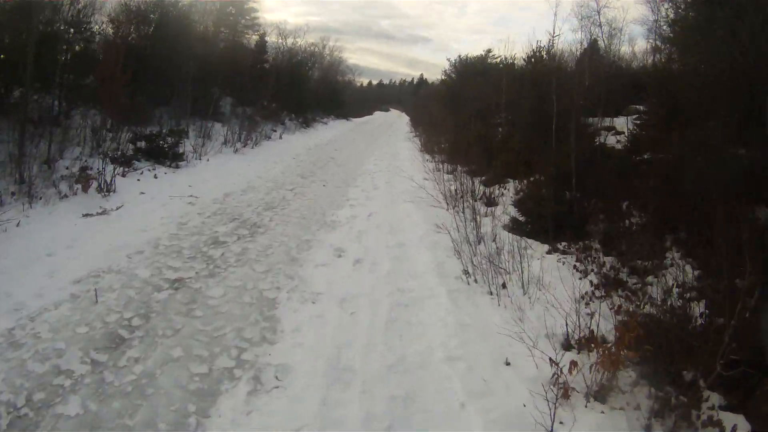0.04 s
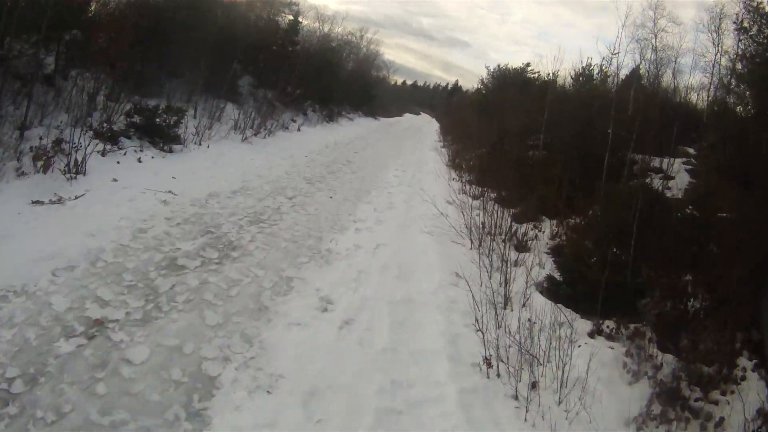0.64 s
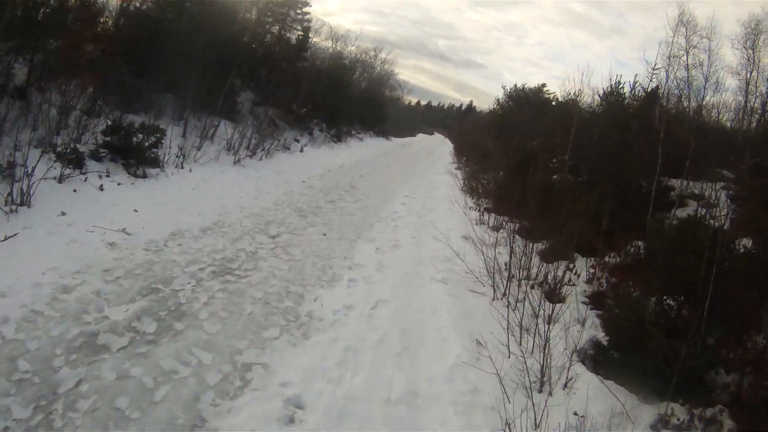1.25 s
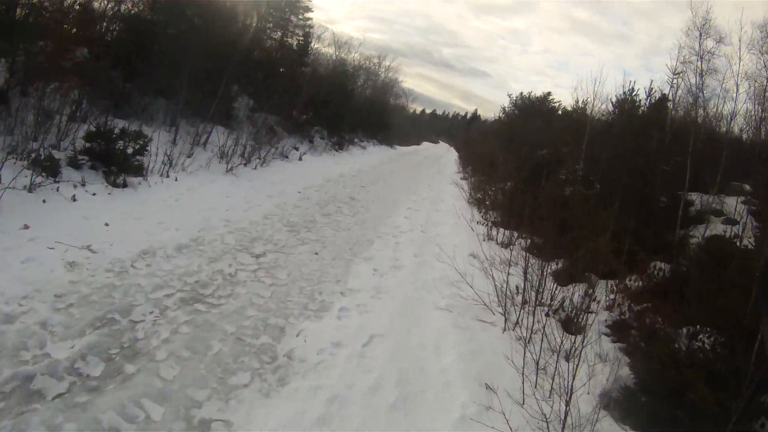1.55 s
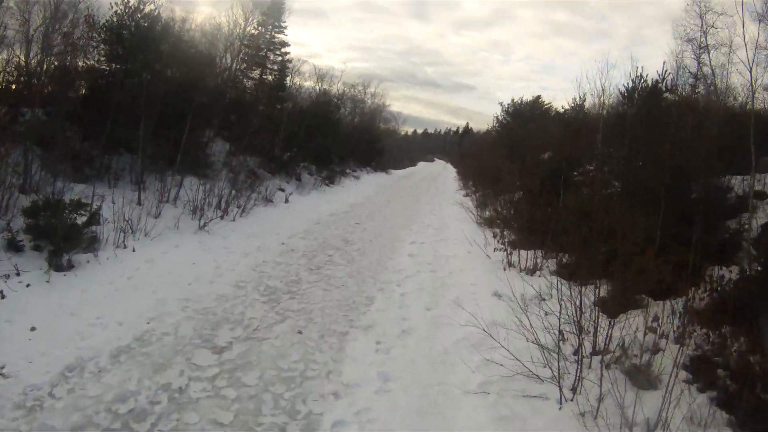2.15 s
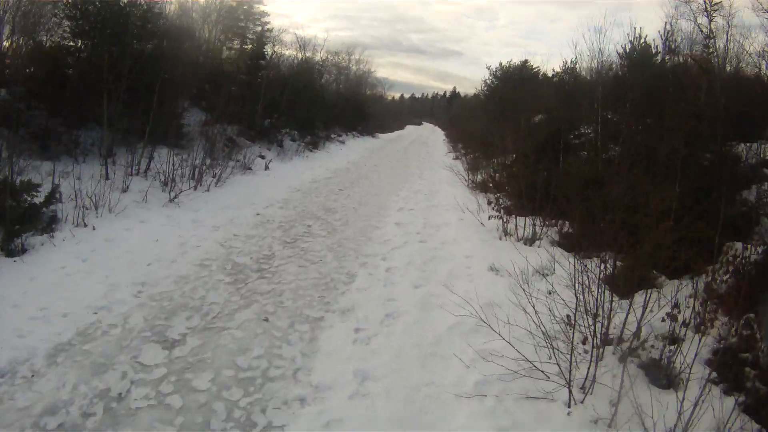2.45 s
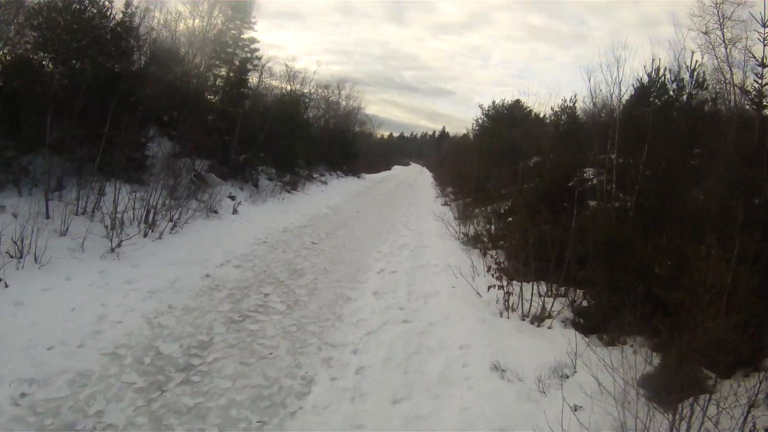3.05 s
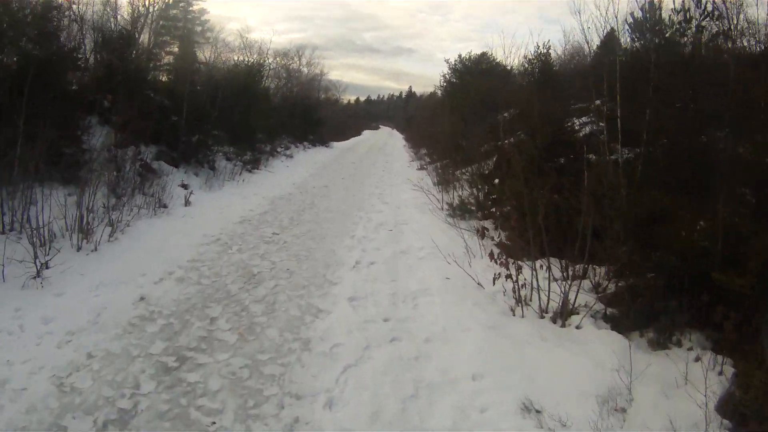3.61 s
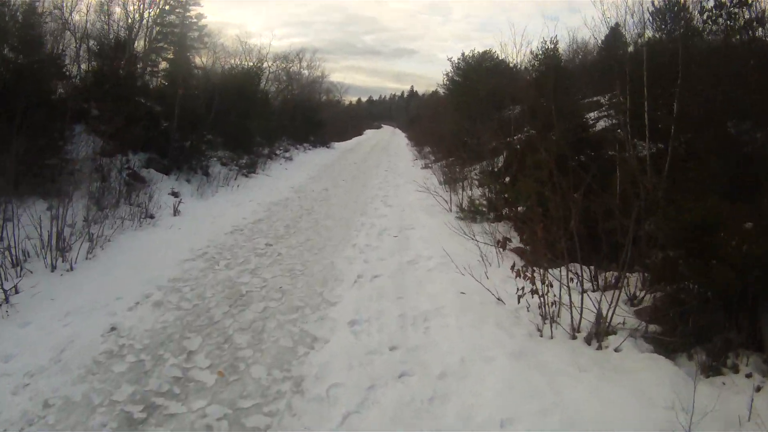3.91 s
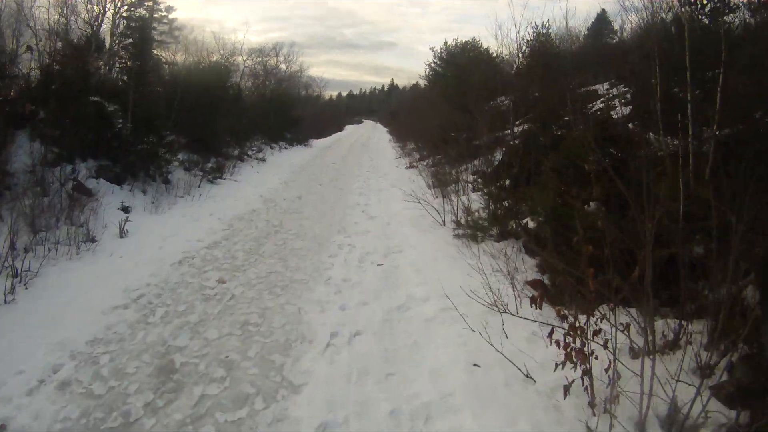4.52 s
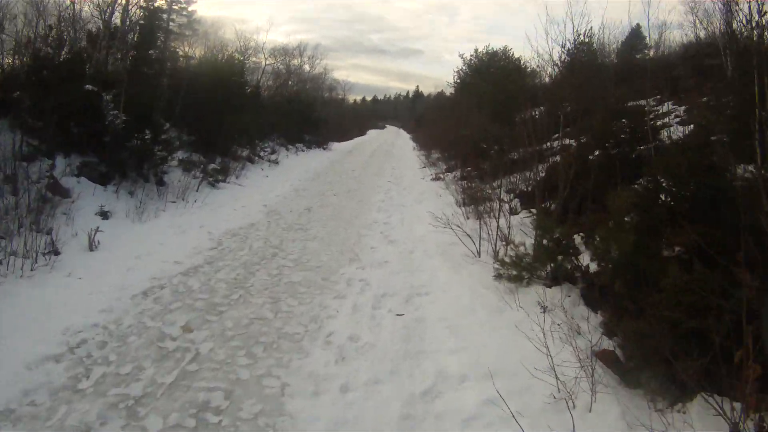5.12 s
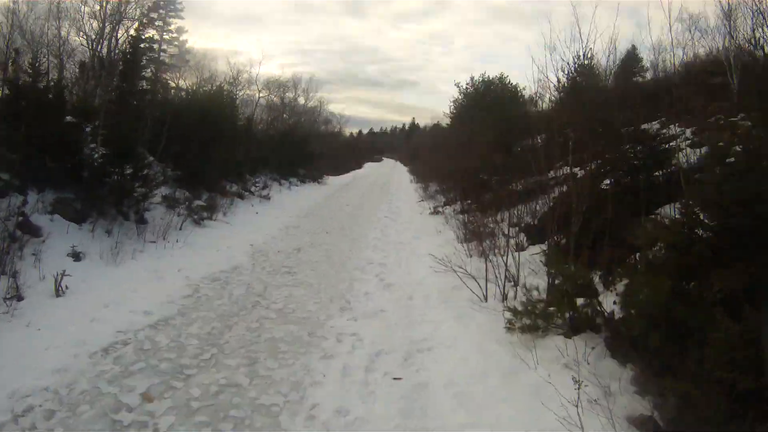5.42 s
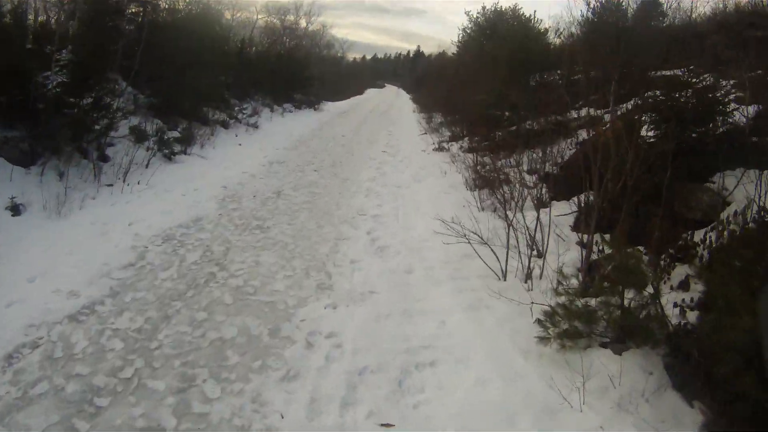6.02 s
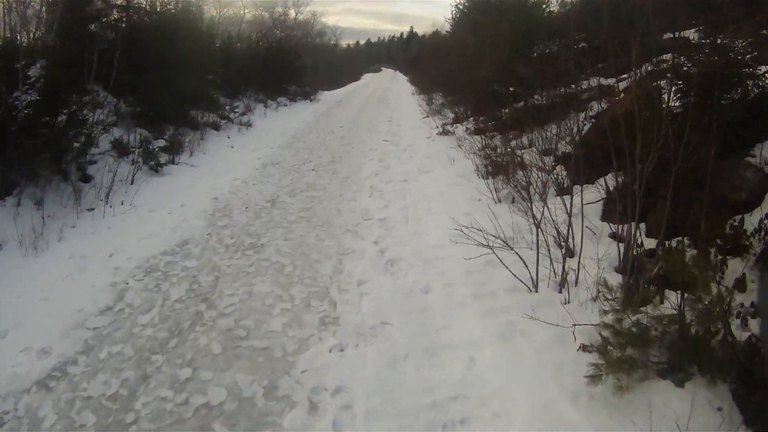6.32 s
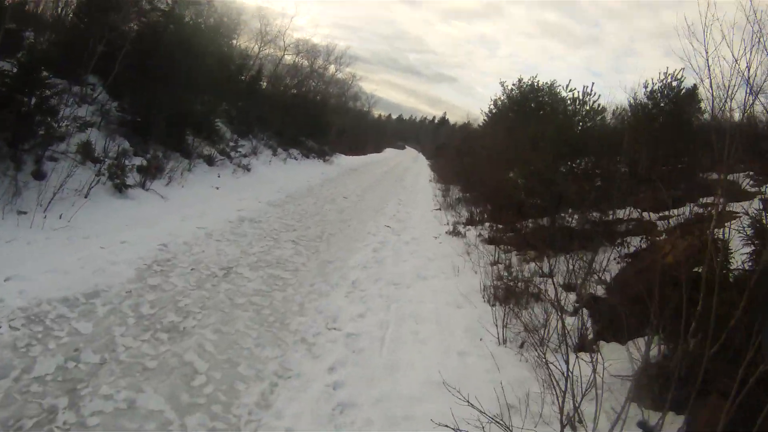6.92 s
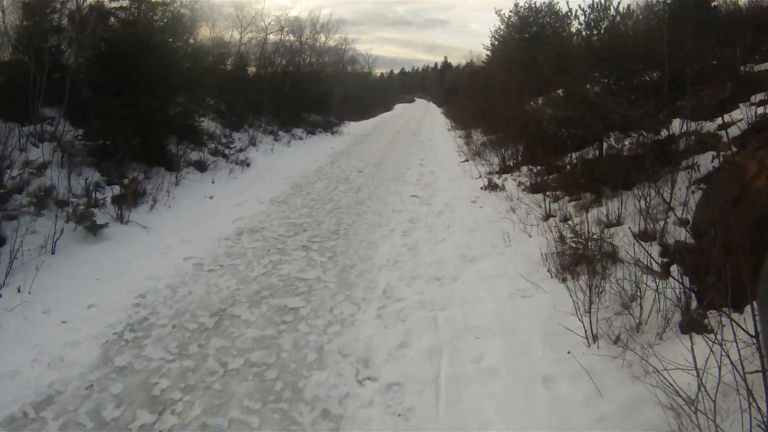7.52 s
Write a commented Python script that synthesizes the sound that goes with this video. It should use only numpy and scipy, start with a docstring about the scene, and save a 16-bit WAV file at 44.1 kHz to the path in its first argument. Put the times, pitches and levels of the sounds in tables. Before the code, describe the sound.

Close, rough crunching of ice under rolling studded bike tyres, with sharp snaps, dull bumps and a little wind.

```python
"""Studded bicycle tyres on a frozen trail.

Heard close up, from a camera microphone in a closed housing that a little wind brushes.
The tyres rumble over frozen ruts and the studs crush the icy crust in crackly bursts. Plates of
ice crack and ring, chips snap off, glaze crackles, shards skitter and packed snow squeaks."""
import sys
import numpy as np
from scipy import signal
from scipy.fft import rfft, irfft, next_fast_len
from scipy.io import wavfile
from scipy.ndimage import map_coordinates

SR = 44100
rng = np.random.default_rng(int(sys.argv[2]) if len(sys.argv) > 2 else 0)


def digitize_waveform(pressure):
    """Quantize a signal to 16-bit integers and store it at the path in sys.argv[1].

    Rows of a 2-D input are taken as channels; values are limited to [-1, 1].
    """
    field = np.atleast_2d(pressure).T
    bounded = np.clip(field, -1, 1)
    quanta = np.round(bounded * 32767).astype(np.int16)
    wavfile.write(sys.argv[1], SR, quanta)


N = 341775


def amp(db):
    """Decibels to gain."""
    return 10 ** (np.asarray(db) / 20)


def unit(x):
    """Scale to rms 1."""
    return x / np.sqrt(np.mean(x ** 2) + 1e-20)


def curves(rows):
    """One value per sample for each column after the time."""
    times, *columns = np.transpose(rows)
    return [np.interp(np.arange(N) / SR, times, column) for column in columns]


def wobble(rate):
    """A smooth random curve, rate knots a second."""
    knots = rng.standard_normal(int(N * rate / SR) + 4)
    return map_coordinates(knots, [np.arange(N) * rate / SR])


def coloured(x, spectrum):
    """Causal filter through (freq_hz, gain_db) points, so that attacks stay sharp."""
    size = 2 * next_fast_len(N // 2 + SR // 10, real=True)
    hz, db = np.transpose(spectrum)
    gain = amp(np.interp(np.log(np.fft.rfftfreq(size, 1 / SR) + 1), np.log(hz), db))
    cepstrum = irfft(np.log(gain))
    cepstrum[1:size // 2] *= 2  # fold to minimum phase
    cepstrum[size // 2 + 1:] = 0
    return irfft(rfft(x, size) * np.exp(rfft(cepstrum)), size)[:N]


def add(track, start_s, sound):
    """Mix a short sound into the track from start_s on."""
    start = int(np.clip(round(start_s * SR), 0, N - 1))
    track[start:start + len(sound)] += sound[:N - start]


def swell(length_s, attack_s, release_s):
    """An envelope that rises, holds until length_s and dies away."""
    t = np.arange(int((length_s + 6 * release_s) * SR)) / SR
    return np.minimum(t / attack_s, 1) * np.exp(-np.maximum(t - length_s, 0) / release_s)


def with_swells(steady_db, events, attack_s, release_s):
    """Two steady levels in dB plus a swell for each event (start_s, length_s, level_db, level_db)."""
    power = amp(steady_db) ** 2
    for start_s, length_s, *levels_db in events:
        for track, db in zip(power, levels_db):
            add(track, start_s, (amp(db) * swell(length_s, attack_s, release_s)) ** 2)
    return 10 * np.log10(power)


def fractures(rate, spread_db, life_s, debris_ratio=0.15):
    """Power (mean 1) of tiny random fractures, each dying fast and leaving longer-lived debris."""
    size = amp(spread_db * np.minimum(rng.standard_normal(N), 1.6))
    hits = (rng.random(N) < rate / SR) * size ** 2
    snap = signal.lfilter([1], [1, -np.exp(-1 / (life_s * SR))], hits)
    debris = signal.lfilter([1], [1, -np.exp(-1 / (4.5 * life_s * SR))], hits)
    return (snap / snap.mean() + debris_ratio * debris / debris.mean()) / (1 + debris_ratio)


def grains(power, spectrum):
    """Bursts of coloured noise that follow a power curve; rms 1."""
    return unit(coloured(np.sqrt(power) * rng.standard_normal(N), spectrum))


def patchy(x, depth_db, width_hz, span_s):
    """Every stretch of ice rings its own way: random hills of gain over frequency and time."""
    hz, t, spectra = signal.stft(x, SR, nperseg=256)
    knots = rng.standard_normal((256, 1024))
    grid = np.meshgrid(hz / width_hz, t / span_s, indexing="ij")
    hills = map_coordinates(knots, grid, order=1, mode="wrap")
    return unit(signal.istft(spectra * amp(depth_db * hills), SR, nperseg=256)[1][:N])


def ping(hz, rise_cycles):
    """A heavily damped flexing of ice; returns the sound and the seconds it takes to peak."""
    t = np.arange(SR // 20) / SR
    rise_s = rise_cycles / hz
    envelope = t / rise_s * np.exp(1 - t / rise_s)
    return envelope * np.cos(2 * np.pi * hz * (t - rise_s)), rise_s


def strays(bite, rate, over_db, hz, spread):
    """Random small breaks (time_s, level_db, pitch_hz), louder with the bite (time_s, level_db)."""
    gap, size, pitch = rng.random((200, 3)).T
    times = np.cumsum(-np.log(1 - gap) / rate)
    levels_db = np.interp(times, *bite.T) + over_db + 6 * (size - 0.5)
    pitches_hz = hz * np.exp(spread * (pitch - 0.5))
    return [row for row in zip(times, levels_db, pitches_hz) if row[0] < N / SR]


# Colour of air on the housing: freq_hz, gain_db
WIND_COLOUR = [(15, -5), (40, 1), (80, 4), (150, 4.5), (400, -15), (3000, -93)]
# Headwind right at the microphone: time_s, level_db
GUSTS = [(0, -50.5), (1.2, -44), (2, -48), (3.2, -55.5), (3.7, -42), (4.7, -64), (5.3, -46), (5.8, -57),
         (6.6, -53), (7.75, -43.5)]


def wind():
    """The headwind buffets the housing softly."""
    gust_db, = curves(GUSTS)
    return amp(gust_db + 1.1 * wobble(3.6)) * unit(coloured(rng.standard_normal(N), WIND_COLOUR))


# Packed snow under the tread: start_s, length_s, level_db, start_hz, end_hz
SQUEAKS = [(.6, .05, -50, 3200, 3400), (.595, .06, -54, 4100, 4350), (.67, .06, -56, 3650, 4200),
           (1.73, .06, -57, 2480, 2300), (3.787, .045, -42, 1860, 1980), (3.825, .045, -43, 1750, 1550),
           (3.872, .035, -46, 2100, 2300), (5.71, .06, -41, 1620, 1540), (6.1, .04, -35, 1420, 1350)]


def squeaks():
    """Rubber sticks and slips on snow in short glides of rough pitch with a weak octave."""
    track = np.zeros(N)
    waver_hz = 105 * wobble(600)
    for start_s, length_s, db, start_hz, end_hz in SQUEAKS:
        n = int(length_s * SR)
        hz = np.linspace(start_hz, end_hz, n) + waver_hz[int(start_s * SR):][:n]
        phase = 2 * np.pi * np.cumsum(hz) / SR
        tone = np.sin(phase) + amp(-15) * np.sin(2 * phase)
        add(track, start_s, amp(db) * np.hanning(n) * tone)
    return track


# Showers of shards on the trail, outside the housing: start_s, length_s, level_db, pitch_hz, width_hz
SHARDS = [(0.164, 0.04, -49.5, 6860, 1500), (0.186, 0.012, -43, 5400, 350), (0.59, 0.025, -46, 3260, 300),
          (4.593, 0.0068, -37, 3580, 280), (6.392, 0.16, -53.5, 5650, 800), (6.853, 0.012, -43, 5750, 280),
          (6.883, 0.028, -53, 5850, 350), (6.94, 0.019, -42, 3170, 450), (6.944, 0.016, -46, 7400, 2000)]


def shards():
    """Dense tiny impacts ring thin shards around one pitch a shower; the housing dulls their top."""
    track = np.zeros(N)
    # a negative spread limits the smallest impacts and leaves the largest free
    impacts = np.sqrt(fractures(rate=890, spread_db=-6.5, life_s=0.0018)) * rng.standard_normal(N)
    for start_s, length_s, db, hz, width_hz in SHARDS:
        envelope = swell(length_s, attack_s=0.01, release_s=0.011)
        resonance = signal.iirpeak(hz, hz / width_hz, SR)
        ring = signal.lfilter(*resonance, impacts[int(start_s * SR):][:len(envelope)])
        add(track, start_s, amp(db) * envelope * unit(ring))
    housing = [(1500, -6), (3000, 2.5), (7000, -3.5), (9000, -10), (15000, -24)]
    return coloured(track, housing)


# Colour of bursting glaze at the microphone: freq_hz, gain_db
GLAZE_COLOUR = [(1500, -19), (3300, -14), (4800, -2), (6000, -2), (7000, -3), (9000, -11.5), (12000, -24),
                (15000, -29)]
# Glassy glaze breaking on the trail: start_s, relative_db
CRACKLES = [(0.171, -31), (0.258, -36), (0.2803, -29), (0.2955, -34), (0.325, -27), (0.3305, -33),
            (0.7626, -37.5), (1.04, -35), (1.061, -42), (1.079, -47), (1.9903, -37), (2.913, -48),
            (3.196, -35), (4.772, -30), (5.174, -38), (5.4841, -22), (6.503, -34), (6.513, -29),
            (6.603, -31), (6.863, -35), (6.8698, -27), (6.884, -30), (6.9015, -35), (6.907, -38),
            (6.911, -35), (6.929, -30), (6.9634, -27), (6.970, -32), (6.987, -27), (7.006, -29)]


def crackles(decay_s=0.0012):
    """Thin glaze bursts in very short sprays that reach far into the treble."""
    track = np.zeros(N)
    t = np.arange(SR // 20) / SR
    for start_s, db in CRACKLES:
        add(track, start_s, amp(db) * np.exp(-t / decay_s) * rng.standard_normal(len(t)))
    return coloured(track, GLAZE_COLOUR)


# Colours of the frame and the tyre casings, heard through the housing: freq_hz, gain_db
FRAME_COLOUR = [(60, -25), (150, -26), (240, -2), (295, -1), (337, 5), (380, 1), (440, 1), (530, -3),
                (640, -6), (900, -9.5), (1600, -22), (5000, -103)]
CASING_COLOUR = [(20, -28), (45, -8.5), (80, -2.5), (130, 1), (220, 3), (280, 1), (380, -22), (800, -34),
                 (4000, -100)]
# Steady rolling between the bumps, close by: time_s, frame_db, casing_db
ROLLING = [(0.0, -34, -37.5), (0.5, -36, -44.5), (0.75, -33, -46), (1.12, -35.5, -35), (1.5, -41, -47),
           (2.05, -40, -38.5), (2.27, -44, -40), (2.6, -36, -43), (3.0, -44, -42), (3.5, -43, -50.5),
           (3.85, -43, -45), (4.4, -35, -38), (5.0, -33.5, -40.5), (5.75, -39, -45), (6.4, -35.5, -37.5),
           (6.8, -36, -42), (7.2, -41, -45.5), (7.75, -37.5, -37)]
# Frozen ruts and lumps that jolt the wheels: start_s, length_s, frame_db, casing_db
RUTS = [(0.364, 0.03, -47, -28), (0.614, 0.05, -32, -31), (0.827, 0.085, -35.5, -39),
        (1.285, 0.066, -31.5, -31.5), (1.65, 0.2, -37.5, -35), (1.898, 0.041, -32.5, -30),
        (1.968, 0.048, -33.5, -35), (2.148, 0.026, -32, -38.5), (2.794, 0.094, -30.5, -33.5),
        (3.153, 0.058, -37.5, -40), (3.251, 0.067, -48, -36), (3.601, 0.12, -34.5, -58),
        (4.023, 0.02, -29, -32), (4.09, 0.14, -34.5, -37.5), (4.782, 0.036, -33, -34),
        (5.244, 0.028, -41, -32), (5.332, 0.1, -54, -33), (5.864, 0.089, -34.5, -36),
        (6.18, 0.12, -34, -42), (6.425, 0.11, -30.5, -53), (6.586, 0.031, -24.5, -54),
        (6.846, 0.054, -32.5, -54), (6.986, 0.023, -31, -36), (7.117, 0.067, -35, -61),
        (7.423, 0.042, -27.5, -43), (7.513, 0.035, -65, -39)]


def tyres():
    """Knobs and lumps thud into the casings, which drone, and shake the hollow frame; ruts swell both."""
    rolling_db = np.array(curves(ROLLING)) - 1.68 * wobble(17)  # the surface is never even
    frame_db, casing_db = with_swells(rolling_db, RUTS, attack_s=0.018, release_s=0.013)
    thuds = fractures(rate=170, spread_db=0.5, life_s=0.0035)
    frame = amp(frame_db - 0.6) * grains(thuds + amp(-12), FRAME_COLOUR)
    casing = amp(casing_db - 0.77) * grains(thuds + amp(-4), CASING_COLOUR)
    return frame + casing


# Colours of crushed crust, splinters and ice dust, heard through the housing: freq_hz, gain_db
CRUNCH_COLOUR = [(100, -35.5), (300, 0), (500, 4.5), (800, 0), (1250, -1.5), (1800, -2.5), (2080, -9),
                 (2400, -21), (3200, -35), (6000, -62), (12000, -85)]
SPLINTER_COLOUR = [(1400, -15), (2350, -13), (2750, 1), (3400, 0), (4100, -4.5), (4800, -9), (5800, -11.5),
                   (6700, -21.5), (7500, -21), (9000, -30.5), (11500, -33.5), (15000, -42)]
DUST_COLOUR = [(2000, -30), (4000, -6), (5700, 1), (7500, -4), (10000, -12), (15000, -19)]
# Steady bite of the studs in the trail: time_s, crunch_db, splinter_db
BITE = [(0.0, -37.5, -48), (0.48, -40, -54), (0.85, -42, -54.5), (1.15, -42.5, -59), (2.0, -45, -58.5),
        (2.25, -50.5, -67), (2.65, -40, -59), (3.0, -51, -63.5), (3.3, -43.5, -57.5), (3.8, -42.5, -54),
        (4.5, -38, -53.5), (5.1, -41.5, -53.5), (5.45, -44, -51), (5.53, -50, -59.5), (5.9, -40.5, -53.5),
        (6.2, -41.5, -55.5), (6.65, -33.5, -51), (6.8, -45.5, -57), (7.1, -37, -50.5), (7.75, -35.5, -54)]
# Brittle crust collapsing under a tyre: start_s, length_s, crunch_db, splinter_db
CRUST_PATCHES = [(0.074, 0.015, -32.5, -42), (0.159, 0.056, -29.5, -50), (0.25, 0.018, -27, -44),
                 (0.279, 0.057, -27.5, -48), (0.594, 0.08, -35.5, -50), (0.735, 0.095, -38.5, -53),
                 (1.045, 0.043, -35, -51.5), (1.99, 0.11, -40.5, -60), (2.441, 0.041, -37.5, -56),
                 (2.586, 0.024, -34.5, -46), (2.62, 0.091, -48, -52.5), (2.809, 0.054, -55, -71),
                 (2.896, 0.022, -34.5, -49), (3.155, 0.048, -37.5, -51), (3.614, 0.087, -38.5, -51),
                 (3.918, 0.029, -37.5, -49), (4.18, 0.0088, -19.5, -38.5), (4.383, 0.011, -25.5, -40.5),
                 (4.585, 0.29, -38, -48), (4.869, 0.037, -29.5, -42), (4.904, 0.057, -30.5, -49),
                 (5.166, 0.017, -29, -39), (5.332, 0.16, -33, -47), (6.033, 0.041, -33.5, -44),
                 (6.098, 0.063, -33, -46), (6.18, 0.11, -40, -52), (6.371, 0.18, -33, -45),
                 (6.483, 0.041, -25, -38.5), (6.56, 0.056, -28, -42.5), (6.836, 0.098, -32.5, -50),
                 (6.94, 0.033, -25, -45), (6.982, 0.036, -30, -44), (7.052, 0.033, -32, -42.5),
                 (7.291, 0.019, -28.5, -66), (7.357, 0.14, -28.5, -44), (7.433, 0.028, -25, -36)]


def studs():
    """Studs crush the crust in clumps, throwing off splinters and a fine sizzle of ice dust."""
    bite_db = np.array(curves(BITE)) + 0.5 * wobble(22)
    crunch_db, splinter_db = with_swells(bite_db, CRUST_PATCHES, attack_s=0.01, release_s=0.0048)
    clumps = amp(1.8 * wobble(60))
    coarse = clumps * fractures(rate=420, spread_db=7, life_s=0.00076)
    fine = clumps * fractures(rate=110, spread_db=5, life_s=0.0012)
    powder = amp(-3.5)  # countless grains too small to tell apart
    crunch = grains(coarse + powder, CRUNCH_COLOUR)
    crunch = patchy(crunch, depth_db=3, width_hz=350, span_s=0.035)
    splinters = grains(coarse + amp(2) * fine + amp(-1), SPLINTER_COLOUR)
    splinters = patchy(splinters, depth_db=3, width_hz=650, span_s=0.035)
    dust = grains(fine + amp(3), DUST_COLOUR)
    dust_db = -64.5 + 0.86 * (splinter_db + 47.5)  # hard crushing makes more dust
    return amp(crunch_db - 0.44) * crunch + amp(splinter_db - 2.05) * splinters + amp(dust_db) * dust


# The largest chips snapping off the trail: time_s, relative_db, pitch_hz
CHIPS = [(0.097, -27, 3440), (0.2804, -38, 4200), (0.3246, -24, 4000), (0.3997, -24, 4550),
         (1.0387, -27.5, 3600), (1.991, -32, 3960), (2.3613, -31, 3540), (2.913, -29, 3400),
         (3.1746, -23, 4570), (3.2223, -30, 3400), (3.2597, -29.5, 3870), (3.287, -35, 4200),
         (3.357, -35, 3550), (3.485, -35, 3400), (3.52, -27, 3200), (3.754, -31, 3800), (3.785, -38, 3500),
         (3.769, -28.5, 3200), (3.8903, -28, 3380), (3.922, -26, 3370), (3.981, -31, 3190),
         (4.042, -28, 3570), (4.119, -26, 3680), (4.1273, -29.5, 3330), (4.182, -16.5, 3460),
         (4.516, -25, 3500), (4.735, -21.5, 3400), (4.953, -17, 3500), (4.983, -26, 2980),
         (5.014, -24, 3270), (5.024, -28, 3140), (5.189, -22, 3500), (5.3211, -23, 3600),
         (5.4864, -23, 2750), (5.608, -32, 3300), (5.6578, -29.5, 4050), (5.704, -23.5, 3700),
         (6.281, -24, 2860), (6.3674, -26.5, 3520), (6.987, -21, 3830), (7.059, -24.5, 3200),
         (7.312, -21, 3130), (7.4488, -26, 3280), (7.538, -25.5, 3350), (7.556, -27, 3350),
         (7.5655, -22, 4600)]


def chips():
    """Chips break off with a tick, a short spray and a ring, and jolt the sheet, which answers lower."""
    ticks, spray, sheet = np.zeros((3, N))
    t = np.arange(SR // 20) / SR
    splinter_bite = np.array(BITE)[:, [0, 2]]
    small = strays(splinter_bite, rate=24, over_db=14.5, hz=3400, spread=0.7)
    scatter = rng.uniform(-1, 1, (len(CHIPS) + 200, 4))
    for (time_s, db, hz), (sheet_shift, *mode_shifts) in zip(list(CHIPS) + small, scatter):
        tick, rise_s = ping(hz, rise_cycles=0.91)
        answer, _ = ping(1550 * 2 ** (0.31 * sheet_shift), rise_cycles=0.71)
        modes = sum(np.sin(2 * np.pi * hz * 2 ** (0.2 + 0.6 * shift) * t) for shift in mode_shifts)
        start_s = time_s - rise_s
        add(ticks, start_s, amp(db - 6) * tick)
        add(spray, start_s, amp(db - 8.5) * np.exp(-t / 0.0016) * rng.standard_normal(len(t)))
        add(spray, start_s, amp(db - 10.5) * np.exp(-t / 0.0018) * modes)
        add(sheet, start_s, amp(min(db, -23) - 9) * answer)
    tick_colour = [(1500, 16), (4500, -4.5), (8000, 9.5), (14000, -4)]
    # the housing passes little of the spray above 7 kHz
    spray_colour = [(300, -12), (1000, -5), (1900, 16), (2450, -4), (3300, 2.5), (4300, -10),
                    (6000, -11), (7500, -21.5), (10000, -36), (15000, -34)]
    return coloured(ticks, tick_colour) + coloured(spray, spray_colour) + sheet


# Modes of hard ice as it splits: pitch_hz, gain_db, decay_s
SPLIT_MODES = [(2010, -1, .0011), (2600, 1, 0.00076), (3280, -4, 0.0018), (4120, -3, 0.00082),
               (5300, -15, .0012), (6300, -13, .0008)]
# A stud splitting hard ice clean through: start_s, relative_db
SPLITS = [(6.3924, -13.5)]


def splits():
    """A clean split is a dry, wide snap: all its modes start at once and die within milliseconds."""
    track = np.zeros(N)
    t = np.arange(SR // 20) / SR
    ring = sum(amp(db) * np.exp(-t / decay_s) * np.sin(2 * np.pi * (hz * t + rng.random()))
               for hz, db, decay_s in SPLIT_MODES)
    onset = 1 - np.exp(-(t / 0.0002) ** 2)
    for start_s, db in SPLITS:
        add(track, start_s, amp(db) * onset * ring)
    return track


# Slabs of ice tearing under the wheels: peak_s, level_db, pitch_hz
SLABS = [(0.075, -22.5, 1760), (1.994, -28, 473), (2.806, -25.5, 290), (2.85, -24.5, 540),
         (4.182, -26.5, 1430), (4.774, -21, 1470), (4.892, -16, 1124), (4.928, -18, 990), (4.944, -23, 790),
         (6.609, -22.5, 424), (7.447, -22, 940)]


def slabs():
    """A slab swells and rings for a few cycles under the cracks that part it."""
    track = np.zeros(N)
    for peak_s, db, hz in SLABS:
        ring, rise_s = ping(hz, rise_cycles=2.55)
        add(track, peak_s - rise_s, amp(db) * ring)
    return track


# Plates giving way close to the microphone, thick ones low, thin ones high: peak_s, relative_db, pitch_hz
PLATE_CRACKS = [(0.0683, -15, 1300), (0.0747, -4.5, 1650), (0.0863, -21, 1400), (0.2492, -13, 1610),
                (0.2525, -9, 1450), (0.2588, -7, 1500), (0.2809, -8, 1510), (0.2915, -14, 1210),
                (0.296, -7.5, 1410), (0.3248, -22, 1310), (0.3275, -9, 1540), (0.3304, -11, 805),
                (0.3881, -14, 260), (0.634, -15, 400), (0.7641, -12, 710), (0.8041, -11, 630),
                (1.0388, -13, 774), (1.14, -16, 600), (1.3075, -18, 800), (1.311, -12.5, 338),
                (1.3491, -11, 543), (1.9927, -7, 520), (2.4673, -13, 720), (2.805, -6, 320),
                (2.8415, -29, 686), (2.8489, -14, 410), (2.8708, -23, 414), (2.9125, -20, 800),
                (3.0377, -15.5, 1420), (3.1985, -9, 1260), (3.3582, -12.5, 1480), (3.672, -11.5, 1010),
                (3.9466, -14.5, 1500), (4.1734, -6, 1440), (4.1821, -6.5, 1360), (4.1882, -11, 900),
                (4.4258, -12, 1230), (4.5309, -7.5, 1430), (4.735, -20, 1280), (4.7732, 0, 1260),
                (4.824, -9, 1400), (4.84, -4, 970), (4.8861, -3, 1300), (4.8918, -2, 890),
                (4.8948, -8, 1070), (4.8978, -3, 850), (4.9277, -15, 980), (4.9399, -1, 1220),
                (4.9468, -8, 800), (4.9552, -6, 1020), (5.1187, -12.5, 960), (5.174, -8, 760),
                (5.2183, -11, 1270), (5.3217, -12, 970), (5.3445, -14, 1100), (5.3473, -11, 475),
                (5.901, -9.5, 292), (5.9418, -10, 660), (6.199, -4, 644), (6.6022, -12, 790),
                (6.607, -13, 490), (6.839, -16, 1000), (6.8495, -10, 530), (6.8699, -4, 766),
                (6.9018, -5.5, 774), (6.9983, -3.5, 800), (7.3069, -6.5, 1550), (7.4415, -6, 1100),
                (7.4499, -4.5, 517), (7.4583, -4.5, 880), (7.5362, -12, 686), (7.553, -9, 310)]


def plates(grit_decay_s=0.0013, crumble_decay_s=0.007):
    """Each plate flexes once or twice as it cracks, then crumbles; the housing dulls its top."""
    flex, grit, crumbling = np.zeros((3, N))
    crumbs = np.sqrt(fractures(rate=900, spread_db=4, life_s=0.0004)) * rng.standard_normal(N)
    t = np.arange(SR // 20) / SR
    crunch_bite = np.array(BITE)[:, [0, 1]]
    small = strays(crunch_bite, rate=12, over_db=14, hz=860, spread=0.83)
    for peak_s, db, hz in list(PLATE_CRACKS) + small:
        bend, rise_s = ping(hz, rise_cycles=0.4)
        burst = np.exp(-t / grit_decay_s) * rng.standard_normal(len(t))
        add(flex, peak_s - rise_s, amp(db - 5) * bend)
        add(grit, peak_s, amp(db - 5.5) * hz / 1000 * burst)  # thin plates are grittier
        add(crumbling, peak_s, amp(min(db, -10) - 11) * np.exp(-t / crumble_decay_s))
    grit += crumbling * crumbs
    crunch = amp(-3.5) * coloured(grit, CRUNCH_COLOUR)
    splinters = amp(-19.5) * coloured(grit, SPLINTER_COLOUR)
    housing = [(60, -22), (200, -1), (1850, -4), (2400, -12), (3300, -3), (6000, -1), (12000, -25)]
    return coloured(flex, housing) + crunch + splinters


def scene():
    """Everything reaches both channels alike through the housing."""
    wheels = tyres() + studs()
    ice = plates() + slabs() + chips() + splits() + crackles() + shards()
    ride = wheels + ice + squeaks() + wind()
    return np.array([ride, ride])


def record(dry):
    """Each channel adds its own faint hiss; nothing is kept above 15.4 kHz."""
    hissy = dry + amp(-83) * rng.standard_normal((2, N))
    in_band = np.fft.rfftfreq(N, 1 / SR) < 15400
    return irfft(rfft(hissy) * in_band, N)


dry = scene()
out = record(dry)
digitize_waveform(out)
```